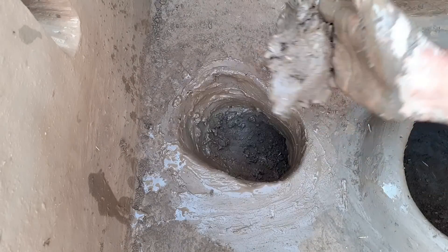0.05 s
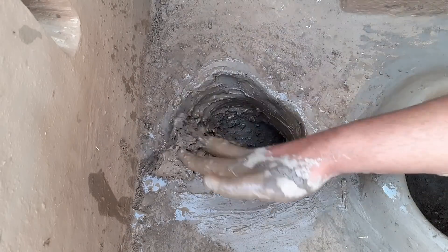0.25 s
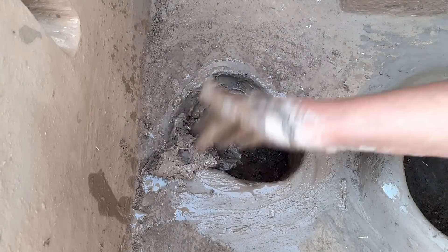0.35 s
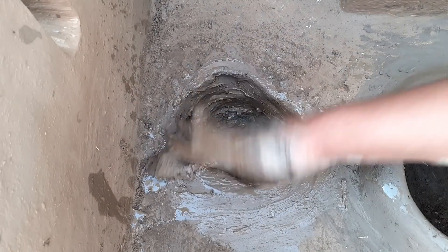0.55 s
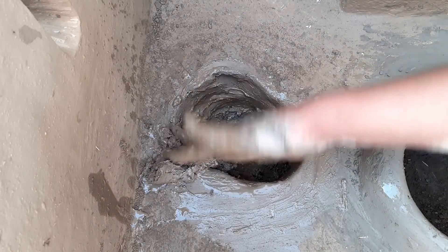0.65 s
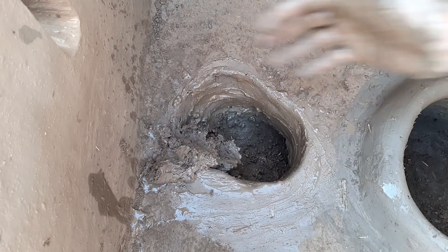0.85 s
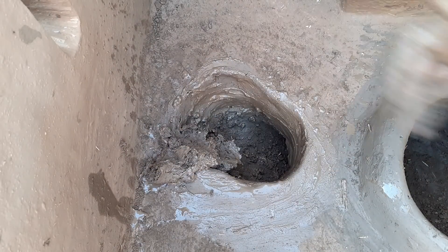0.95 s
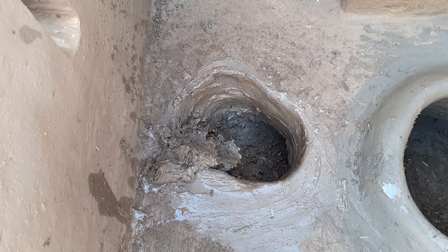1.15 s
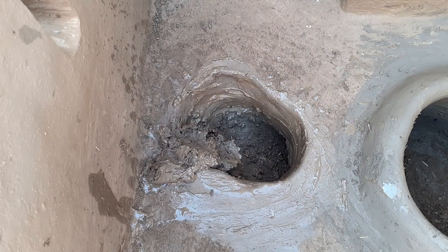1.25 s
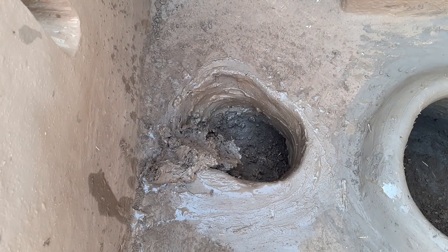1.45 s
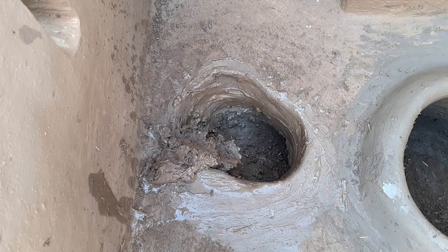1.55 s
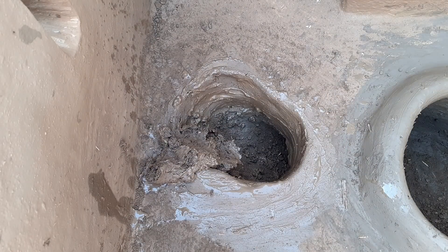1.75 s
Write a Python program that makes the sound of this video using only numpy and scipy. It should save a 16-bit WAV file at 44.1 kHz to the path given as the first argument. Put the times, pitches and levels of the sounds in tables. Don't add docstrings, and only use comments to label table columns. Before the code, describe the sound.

One sharp wet clay slap with a dull thud, followed by sticky snaps and faint distant scraping

```python
import sys
import numpy as np
from scipy import signal
from scipy.io import wavfile

SR = 44100
rng = np.random.default_rng(int(sys.argv[2]) if len(sys.argv) > 2 else 0)


def makeup_ratio(level_db):
    decades = np.asarray(level_db, float) / 20
    return 10 ** decades


def transcribe(u):
    v = np.clip(np.atleast_2d(u).T, -1, 1)
    q = np.round(v * 32767).astype(np.int16)
    wavfile.write(sys.argv[1], SR, q)


N = 79380
T = np.arange(N) / SR

# (frequency [Hz], density [dB])
YARD_SPECTRUM = [(30, -22), (70, 0), (200, -19), (450, -20.5), (720, -25.5), (1500, -18.5), (3200, -40),
                 (7800, -26), (9500, -43.5), (16500, -33)]
# (frequency [Hz], level difference [dB])
FAR_BALANCE = [(60, -11.5), (300, -11), (15000, -7.5)]
# (frequency [Hz], correlation [-1 to 1])
FAR_LIKENESS = [(60, 1), (290, 0.91), (1400, -0.21), (15000, 0.17)]
# (time [s], level [dB], upper level [dB], upper centre [Hz])
STROKE_CURVE = [(0, -54, -75, 2540), (.3, -63.5, -56, 2570), (.55, -55, -82.5, 2320),
                (.72, -72, -75.5, 2520), (.93, -70.5, -71.5, 2500), (.97, -60.5, -86, 2600),
                (1.01, -57, -72, 3200), (1.06, -57, -55, 3500), (1.15, -56, -56, 3340),
                (1.22, -63, -68, 3440), (1.33, -61.5, -72, 2884), (1.46, -73, -80, 2660),
                (1.56, -55, -67, 3570), (1.68, -56, -60.5, 3990), (1.72, -60, -56, 4220),
                (1.8, -56.5, -56, 4400)]
# (frequency [Hz], width [Hz], level [dB])
BLADE_LOW_MODES = [(924, 160, -10), (1443, 76, -4.5), (1570, 500, -2), (1891, 110, -4)]
# (frequency [Hz], level [dB])
BLADE_TOP_MODES = [(2500, -4.5), (2770, -1), (3050, -5.5), (3270, -1.5), (3560, -2.5), (3800, -2.5),
                   (4080, -2.5), (4380, -4.5)]
# (start [s], length [s], frequency [Hz], width [Hz], level [dB])
FAR_RINGS = [(1.08, .07, 4800, 200, -70), (0.294, .09, 150, 55, -55), (0.513, 0.21, 200, 84, -61.5),
             (0.781, 0.136, 300, 50, -58), (1.09, .05, 3300, 90, -60), (1.27, .12, 600, 250, -66),
             (1.68, .06, 3950, 120, -63), (.42, .08, 280, 70, -58), (1.73, 0.079, 1020, 150, -60.5),
             (1.72, .08, 520, 630, -66), (1.1, 0.043, 6540, 340, -69)]
# (time [s], low hum level [dB], second hum level [dB])
HOLLOW_CURVE = [
    (0, -60, -74),
    (.14, -54.5, -65),
    (0.201, -66, -67),
    (0.302, -46, -49),
    (.5, -53.5, -57.5),
    (.8, -52, -61.5),
    (0.998, -58.5, -67),
    (1.45, -65.5, -70),
    (1.8, -54.5, -68.5),
]
# (frequency [Hz], width [Hz])
HOLLOW_MODES = [
    (102, 12.5),
    (307, 98),
]
# (start [s], length [s], level [dB])
AIR_WHISTLES = [
    (.31, 0.13, -57),
    (0.601, 0.072, -56),
    (0.763, 0.13, -56.5),
]
# (start [s], length [s], frequency [Hz], level [dB])
STOVE_DRONES = [(0.012, 0.022, 300, -54.5), (0.06, 0.044, 291, -63), (0.165, 0.034, 60.9, -58.5),
                (0.008, 0.019, 414.5, -47), (0, 0.03, 201, -55), (0.046, 0.051, 373.5, -54.5),
                (0.049, 0.059, 187.7, -54), (0.762, 0.059, 299, -56.5), (0.892, 0.072, 335, -61.5),
                (1.561, 0.042, 101.3, -53), (1.707, 0.13, 100, -53)]
# (frequency [Hz], level [dB], decay time T60 [s])
BODY_MODES = [(80, -16, 0.12), (103.4, -8.5, 0.064), (212, -16.5, 0.11), (275, -10, 0.04),
              (330, -11, 0.045), (462, -21, 0.075), (620, -24, 0.027), (727, -26.5, 0.028),
              (160, -14, 0.05), (920, -25.5, 0.019), (1240, -14.5, 0.015), (1695, -3.5, 0.0088),
              (1980, -8, 0.016), (2466, -6, 0.016)]
# (time [s], level [dB])
BODY_PUSHES = [
    (.2304, -22),
    (.2334, -24),
    (.2362, -20),
    (.2399, -21),
]
# (start [s], length [s], level [dB], centre [Hz])
CLAY_SMEARS = [(0, .027, -50, 4500), (0, .026, -46, 1600), (.017, .01, -44, 1700), (0, .211, -59, 11000),
               (0.166, 0.12, -53.5, 5600), (.306, .013, -46, 13000), (.329, .022, -47, 13000),
               (.27, .04, -57, 9000), (0.55, 0.061, -52, 6740), (0.6, 0.11, -60, 12000),
               (0.664, 0.026, -45, 12000), (.69, .015, -54, 11000), (0.763, 0.11, -70, 7500)]
# (time [s], peak [dB], centre [Hz], decay [ms])
CLAY_SNAPS = [(.0445, -41, 14000, 1.5), (.0815, -42, 6500, 1.5), (.0935, -42, 6000, 2),
              (.1185, -38, 14500, 2), (.1205, -41, 6000, 2), (.1400, -38, 13500, 1.5),
              (.1630, -39, 6500, 2), (.0660, -41, 12000, 2), (.053, -40, 10000, 2), (.062, -40, 6000, 2.5),
              (.072, -39, 6000, 2.5), (.077, -38, 14000, 2), (.1082, -37, 12200, 2.5),
              (.1395, -35, 7300, 1.6), (.1585, -35, 15000, 4), (.2084, -37, 10000, 3),
              (.3085, -33, 13000, 2), (.3137, -23, 7800, 1.2), (.3140, -28, 14000, 3),
              (.3178, -26, 7200, 1.3), (.3275, -30, 13000, 4), (.3358, -26, 4900, 2.5),
              (.3475, -29, 6800, 2), (.3487, -27, 12000, 1.5), (.3490, -29, 5000, 2.5),
              (.3515, -32, 6500, 2), (.5541, -30, 8510, 3), (.5550, -34, 12000, 2), (.5625, -34, 8000, 3),
              (.579, -37, 4500, 3), (.598, -36, 7500, 5), (.604, -37, 6500, 3), (.6660, -20, 7900, .6),
              (.6661, -23, 4200, .6), (.6663, -27, 1000, 1.2), (.6672, -32, 1900, 1.2),
              (.6678, -27, 7500, 1.5), (.6698, -26, 8000, 1.2), (.6715, -24, 14500, 2),
              (.6798, -26, 5600, 1.2), (.6810, -28, 12500, 2), (.6822, -27, 12500, 1.5),
              (.6845, -32, 7000, 1.5), (.6880, -32, 7800, 2)]
# (time [s], peak [dB], centre [Hz], decay [ms], pan [dB])
SLAP_HITS = [(.2301, -2.5, 10500, .9, 5), (.2313, -3, 11500, 1.3, 4), (.2328, -4, 8000, 1.2, 4),
             (.2342, -7, 6800, 1.8, 0), (.2262, -25, 2200, 6, -3), (.2382, -7, 1800, 1.8, -8),
             (.2402, -13, 1700, 2.0, -8), (.249, -27, 2300, 4, -6), (.2555, -29, 2300, 3, -6),
             (.266, -33, 1900, 5, -6), (.278, -35, 1600, 5, -6), (.2385, -15, 11500, 1.5, 0),
             (.2445, -19, 8000, 3.5, 0), (.2465, -16, 14000, 4, 0), (.2515, -25, 7500, 6, -2)]
# (start [s], length [s], frequency [Hz], level [dB])
DUCK_LEAKS = [
    (.2135, .003, 5950, -55),
    (.218, .006, 2400, -56),
]

YARD_DB = -59.5
TOP_SPREAD_HZ, EDGE_HZ = 1350, 100
FLICKER_DB = 2.2
WHISTLE_HZ, DRONE_ROUGH_RAD = 1332, .7
THUD_CUT_HZ, KNOCK_FROM_HZ, KNOCK_LAG_S = 470, 560, .00025
GRAINS_PER_S, GRAIN_SPREAD_DB = 9300, 4
PORT_LAG_S, PORT_SHARED = .0005, .6
SMEAR_FADE_S = .0045
DIP_HZ, DIP_WIDTH_HZ, DIP_SHARE = 10100, 1730, .52
CLICK_SHARE, SNAP_PAN_DB = 4, -3
ECHO_DB, ECHO_T60_S = -15, .13
DUCK_DB, DUCK_S, DUCK_END_S = -24, .2112, .2250
CEILING, CUTOFF_HZ = 1.2, 16300


def rms_one(x):
    return x / np.sqrt(np.mean(x ** 2) + 1e-20)


def in_time(rows):
    s, *columns = np.transpose(rows)
    return [np.interp(T, s, column) for column in columns]


def at_hz(points, hz):
    f, value = np.transpose(points)
    return np.interp(np.log(hz), np.log(np.maximum(f, 1)), value)


def drift(rate):
    coarse = 40
    r = np.exp(-2 * np.pi * coarse * rate / SR)
    noise = rng.standard_normal(N // coarse + 2002)
    slow = signal.lfilter([1], [1, -2 * r, r * r], noise)[2000:]
    return np.interp(np.arange(N) / coarse, np.arange(len(slow)), rms_one(slow))


def gate(start, length, fade):
    rise, fall = (T - start) / fade + 1, (start + length - T) / fade + 1
    return np.clip(np.minimum(rise, fall), 0, 1) ** 2


def butter(order, edges_hz, kind, x):
    return signal.sosfilt(signal.butter(order, edges_hz, kind, fs=SR, output="sos"), x)


def resonate(x, hz, width_hz):
    r = np.exp(-np.pi * width_hz / SR)
    gain = (1 - r * r) / 2
    poles = [1, -2 * r * np.cos(2 * np.pi * hz / SR), r * r]
    return signal.lfilter([gain, 0, -gain], poles, x + 1e-18)


def place(mid_side, hz):
    alike = np.clip(at_hz(FAR_LIKENESS, hz), -.99, .99)
    pan_db = at_hz(FAR_BALANCE, hz)
    mid = np.sqrt(1 + alike) * mid_side[0]
    side = np.sqrt(1 - alike) * mid_side[1]
    lr = (mid + side * np.array([[1], [-1]])) * makeup_ratio(np.array([[pan_db / 2], [-pan_db / 2]]))
    return lr / np.sqrt(np.mean(lr.mean(axis=0) ** 2))


def humming(hz, width_hz):
    x = rng.standard_normal((2, N))
    for _ in range(2):
        x = resonate(x, hz, width_hz * 1.38)
    return place(x, hz)


def yard():
    out, edges = 0, 30 * 2 ** np.arange(0, 9.6, .5)
    white = rng.standard_normal((2, 2, N))
    for k, (lo, hi) in enumerate(zip(edges, edges[1:])):
        hz = np.sqrt(lo * hi)
        x = butter(2, [lo, min(hi, 20000)], "band", white[k % 2])
        level_db = at_hz(YARD_SPECTRUM, hz) + 10 * np.log10(hi - lo)
        out = out + makeup_ratio(level_db + 2.7 * drift(7.4)) * place(x, hz)
    return makeup_ratio(YARD_DB) * out / np.sqrt(np.mean(out.mean(axis=0) ** 2))


def strokes():
    db, top_db, centre = in_time(STROKE_CURVE)
    out = 0
    for hz, width, mode_db in BLADE_LOW_MODES:
        out = out + makeup_ratio(db + mode_db + FLICKER_DB * drift(6.4)) * humming(hz, width)
    for hz, mode_db in BLADE_TOP_MODES:
        offset = (hz - centre) / np.where(hz > centre, EDGE_HZ, TOP_SPREAD_HZ)
        level_db = top_db + mode_db - 1.0 + 1.2 * drift(5.5) - 1.5 * offset ** 2
        out = out + makeup_ratio(level_db) * humming(hz, 90)
    hiss = butter(6, [1200, 8600], "band", rng.standard_normal((2, N)))
    hiss = signal.lfilter([1], [1, -.4], hiss)
    for s, length, hz, width, ring_db in FAR_RINGS:
        out = out + makeup_ratio(ring_db) * gate(s, length, .043) * humming(hz, width)
    return out + makeup_ratio(.53 * top_db - 28.5) * place(hiss, 2500)


def hollow():
    out = 0
    for db, (hz, width) in zip(in_time(HOLLOW_CURVE), HOLLOW_MODES):
        out = out + makeup_ratio(db + .5 + 1.45 * drift(44.3)) * humming(hz, width)
    whistle = sum(makeup_ratio(db) * gate(s, length, .038) for s, length, db in AIR_WHISTLES)
    out = out + whistle * humming(WHISTLE_HZ, 88)
    for s, length, hz, db in STOVE_DRONES:
        level_db = db + 2.5 * drift(40) + np.array([[-5.5], [3.3]])
        phase = DRONE_ROUGH_RAD * drift(30) + rng.uniform(0, 6.1)
        tone = np.sqrt(2) * np.sin(2 * np.pi * hz * T + phase)
        out = out + gate(s, length, .012) * makeup_ratio(level_db) * tone
    return out


def body():
    s, db = np.transpose(BODY_PUSHES)
    thud, knock = np.zeros((2, N)), np.zeros((2, N))
    for hz, mode_db, t60 in BODY_MODES:
        hits = np.zeros((2, N))
        chance_db = 1.72 * rng.normal(0, 1, (len(s), 2)).T
        hits[:, (s * SR).astype(int)] = makeup_ratio(db + mode_db + chance_db)
        ring = resonate(hits, hz, np.log(1000) / np.pi / t60) * SR * t60 / np.log(1000)
        if hz > KNOCK_FROM_HZ:
            knock += ring
        else:
            thud += ring
    thud = butter(4, [55, THUD_CUT_HZ], "band", thud)
    knock = butter(3, [KNOCK_FROM_HZ, 3000], "band", knock)
    knock[0] = np.roll(knock[0], int(KNOCK_LAG_S * SR))
    return thud * makeup_ratio(np.array([[-2.5], [2.5]])) + knock * makeup_ratio(np.array([[-6.5], [3.5]]))


def grains(count):
    shape = (3, count)
    size = makeup_ratio(GRAIN_SPREAD_DB * np.minimum(rng.exponential(1, shape), 5)) * rng.choice([-1, 1], shape)
    g = size * (rng.random(shape) < GRAINS_PER_S / SR) + .6 * rng.standard_normal(shape)
    i = np.arange(count)
    late = np.interp(i - PORT_LAG_S * SR, i, g[0], period=count)
    shared = np.array([g[0], late])
    return rms_one(np.sqrt(PORT_SHARED) * shared + np.sqrt(1 - PORT_SHARED) * g[1:])


def dip_fizz(x):
    return x - DIP_SHARE * resonate(x, DIP_HZ, DIP_WIDTH_HZ)


def smears():
    out = 0
    for s, length, db, hz in CLAY_SMEARS:
        level = makeup_ratio(db + FLICKER_DB * drift(88))
        fizz = rms_one(butter(2, [hz / 2.8, min(hz * 2.0, 19000)], "band", grains(N)))
        out = out + gate(s, length, SMEAR_FADE_S) * level * fizz
    return dip_fizz(out) * makeup_ratio(np.array([[-.5], [3]]))


def cracks(rows, sharp, wide_db, reach):
    size = 2048
    out, t = np.zeros((2, N + size)), np.arange(size) / SR
    for s, db, hz, ms, pan_db in rows:
        x = grains(size) * np.exp(-t * 1000 / ms) * (1 - np.exp(-t / .000067))
        x[[0, 1], [2, 2 + int(PORT_LAG_S * SR)]] += CLICK_SHARE
        wide = butter(3, max(hz / reach, 700), "high", x)
        x = rms_one(resonate(x, hz, hz / sharp)) + makeup_ratio(wide_db) * rms_one(wide)
        i = int(s * SR)
        level = makeup_ratio(db + np.array([[pan_db / 2], [-pan_db / 2]]))
        out[:, i:i + size] += x / np.abs(x).max() * level
    return out[:, :N]


def snaps():
    rows = [tuple(row) + (SNAP_PAN_DB,) for row in CLAY_SNAPS]
    return cracks(rows, sharp=5, wide_db=-5, reach=2)


def slap():
    return cracks(SLAP_HITS, sharp=2.5, wide_db=-3, reach=5)


def echoes(x):
    t = np.arange(6000) / SR
    tail = rng.standard_normal((2, 6000)) * makeup_ratio(-60 * t / ECHO_T60_S) * (t > .003)
    tail = signal.lfilter([.5], [1, -.5], tail)
    tail = tail / np.sqrt(np.sum(tail ** 2) / 2)
    return makeup_ratio(ECHO_DB) * signal.fftconvolve(x, tail, axes=1)[:, :N]


def scene():
    near = snaps() + slap() + body()
    return near + echoes(near) + smears() + hollow() + strokes() + yard()


def roll_off(x):
    return signal.sosfilt(signal.butter(12, 16970, fs=SR, output="sos"), x)


def record(dry):
    fade = .002
    x = dry * makeup_ratio(DUCK_DB * gate(DUCK_S + fade, DUCK_END_S - DUCK_S - 2 * fade, fade))
    for s, length, hz, db in DUCK_LEAKS:
        x = x + makeup_ratio(db) * gate(s, length, fade) * humming(hz, 300)
    x = CEILING * np.tanh(x / CEILING)
    x = signal.sosfilt(signal.cheby2(12, 60, CUTOFF_HZ + 600, fs=SR, output="sos"), x)
    return roll_off(x)


dry = scene()
out = record(dry)
transcribe(out)
```